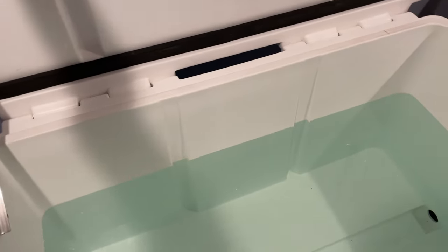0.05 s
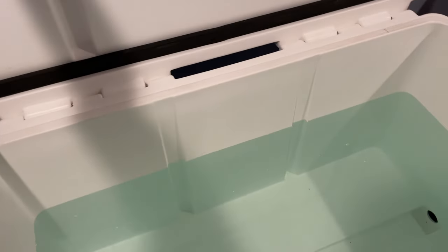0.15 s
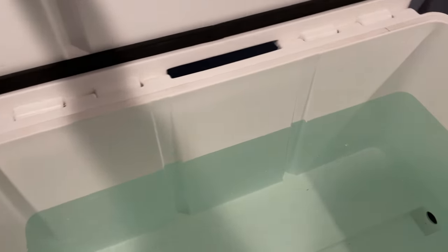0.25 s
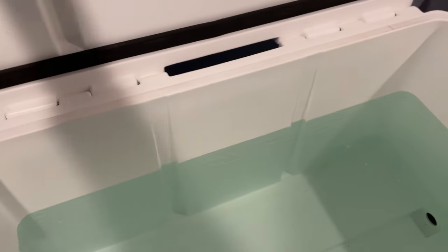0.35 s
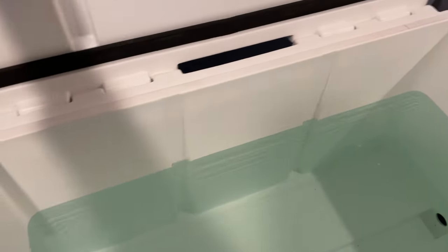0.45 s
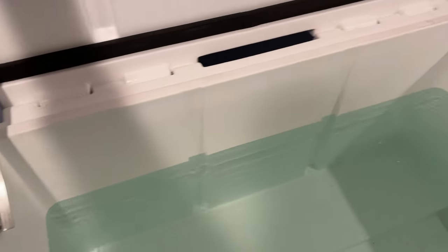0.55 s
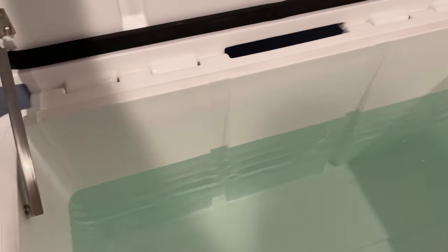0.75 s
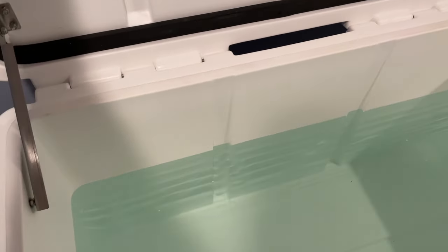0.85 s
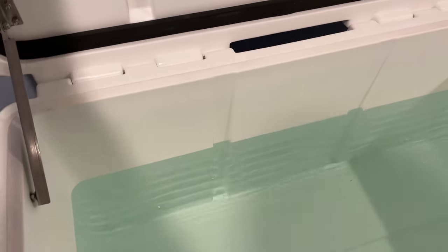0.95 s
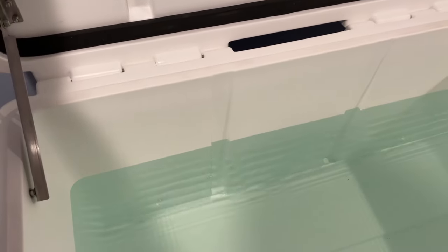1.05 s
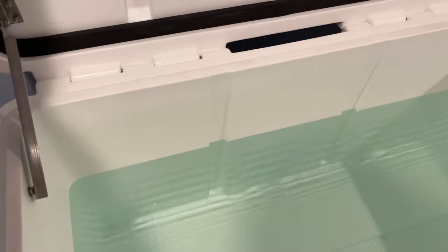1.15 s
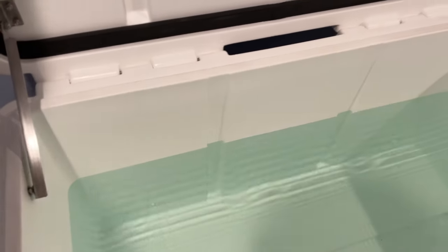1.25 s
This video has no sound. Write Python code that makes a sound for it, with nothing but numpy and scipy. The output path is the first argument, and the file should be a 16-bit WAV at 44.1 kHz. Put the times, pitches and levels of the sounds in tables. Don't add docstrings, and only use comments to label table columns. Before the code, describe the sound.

A heavy cooler lid scrapes softly on its hinge, slams back with a loud hollow plastic thump and low boom, bounces and rattles briefly, then gives faint clicks; close phone microphone, short reflections from nearby walls.

```python
import sys
import numpy as np
from scipy import signal
from scipy.fft import rfft, irfft
from scipy.io import wavfile
from scipy.ndimage import uniform_filter1d

SR = 44100
rng = np.random.default_rng(int(sys.argv[2]) if len(sys.argv) > 2 else 0)


def master_out(mix):
    frames = np.transpose(np.atleast_2d(mix))
    ceiling = np.clip(frames, -1, 1)
    pcm = np.round(ceiling * 32767).astype(np.int16)
    wavfile.write(sys.argv[1], SR, pcm)


def ratio_of_db(decibels):
    return 10 ** (np.asarray(decibels, float) / 20)


N = 57330

# frequency in Hz, density in dB per Hz.
AIR_COLOUR = [(18, -58.5), (30, 4.5), (150, 6.5), (189, -7), (226, -12.5), (452, -18), (716, -32),
              (1110, -24), (13600, -56)]
AIR_DB = -50.5

# frequency in Hz, t60 in seconds.
WALL_DECAY = [(100, 0.73), (500, 0.31), (2000, 0.34), (6000, 0.19), (13000, 0.21)]
WALLS_DB, WALLS_RISE_S, WALLS_FROM_HZ = -7, 0.0092, 285

# start in seconds, frequency in Hz, level in dB, t60 in seconds.
STAY_TICKS = [
    (.716, 1130, -44, .022),
    (.718, 2200, -43, .015),
    (.719, 620, -48, .015),
    (.722, 4300, -68, .015),
    (.800, 5150, -72, .2),
    (.850, 2900, -50, .012),
    (.852, 5150, -72, .25),
    (.870, 2200, -46, .014),
    (.935, 5170, -70, .5),
]

# start in seconds, frequency in Hz, level in dB, t60 in seconds.
PART_NOTES = [(.003, 468, -27, 0.24), (.082, 441, -25.5, 0.18), (.193, 207.3, -21, 0.13),
              (.197, 77, -17.5, 0.26), (.265, 3640, -22, 0.02), (.265, 6200, -34, 0.13),
              (.266, 496, -2.5, 0.044), (.266, 4150, -28, .04), (.267, 615, -6.5, 0.02),
              (.272, 334, -12.5, 0.16), (.286, 337, -15.5, 0.076), (.290, 677, -22.5, 0.13),
              (.297, 1178, -31.5, 0.29), (.298, 4000, -32.5, 0.1), (.305, 151.6, -11.5, .13),
              (.310, 431.2, -12, 0.12), (.325, 63.3, -10, 0.26), (.326, 1196, -26.5, 0.11),
              (.330, 660, -26, 0.13), (.345, 1455, -32.5, 0.067), (.391, 4100, -34.5, 0.084),
              (.391, 4180, -38, 0.042), (.410, 4800, -43, 0.0386), (.410, 6370, -36.5, 0.037),
              (.411, 7400, -49, .07), (.416, 5160, -38, 0.055), (.469, 142.4, -27, 0.93),
              (.478, 474.6, -34, 0.21), (.507, 243, -29.5, 0.71), (.53, 59, -35, 1.6),
              (.545, 433.6, -38.5, 0.18), (.752, 501, -41.5, 0.063), (.790, 138, -37, 0.13),
              (.838, 485, -35.5, 0.076), (.848, 319, -33, 0.068), (.851, 165.5, -28, 0.1),
              (.880, 319.1, -39.5, 0.23), (.919, 9814, -47.5, 0.2), (.920, 793, -44, .12),
              (.920, 5280, -52, 0.069), (.921, 540, -41, .15), (.921, 1150, -45, 0.15),
              (.921, 2210, -48, 0.063), (.921, 4100, -59, 0.12), (.921, 5500, -62, .07),
              (.921, 6140, -57, .08), (.953, 413.2, -37, 0.33), (.985, 250, -43, 0.52),
              (1.061, 489, -30.5, 0.064), (1.061, 960, -46.5, 0.045), (1.064, 121.7, -27.5, 0.095),
              (1.082, 396, -42, 0.1), (1.136, 54.4, -35.5, 0.78), (1.252, 329, -45.5, 0.3)]
WAVER_CYCLES, WAVER_DB = 14, 1.1
RISE_SHARE = 0.018

# time in seconds, level in dB.
RUB_EFFORT = [
    (0, -40.5),
    (.07, -40),
    (.18, -37.5),
    (.25, -37.5),
    (.34, -39.5),
    (.42, -46),
    (0.499, -56.5),
    (.56, -62.5),
    (.64, -78),
]
# frequency in Hz, density in dB per Hz.
RUB_COLOUR = [(60, -45), (150, -38.5), (430, -2.5), (700, -11), (2000, -21.5), (6200, -34.5), (9500, -39.5),
              (13600, -43.5)]
# mode in Hz, level in dB, t60 in seconds.
HELD_LID = [(441, -1.5, 0.11), (485, -8, 0.086), (576.4, -6, 0.053), (660, -18, .07), (786, -19.5, .06),
            (924, -21, .12), (1040.4, -14, 0.094), (1169, -22.5, .07)]
# mode in Hz, level in dB, t60 in seconds.
STAY = [(2090, 0, .025), (2960, -2, .025), (4110, -4, .025), (5150, -8, .025), (6200, -8, .025),
        (9850, -14, .02), (10800, -10, .015), (12400, -16, .02)]
RUB_HISS_DB, RUB_LID_DB, RUB_STAY_DB = 3, 2, -17
SLIPS_PER_S, SLIP_SCATTER_DB = 3500, 2

# start in seconds, tub level in dB, lid level in dB, contact time in ms.
HITS = [(.001, -70, -41, 22), (0.087, -72, -36, 3.9), (0.196, -30, -34, 6.1), (.265, -54, -14.5, 10.3),
        (0.297, -24, -21, 34.6), (.335, -30.5, -37, 2.1), (0.393, -24, -30.5, 19.7),
        (0.411, -30.5, -37.5, 18), (.455, -22.5, -32.5, 20.3), (0.504, -33.5, -43, 6.9),
        (.733, -55, -47, 36), (.785, -43.5, -49, 15), (.836, -62, -44.5, 12), (.850, -45, -46.5, 9.7),
        (.900, -43, -51.5, 6), (0.921, -46, -45, 20), (.945, -45.5, -50.5, 19), (0.991, -61, -51.5, 31),
        (1.062, -39, -42.5, 14.2), (1.13, -54, -53.5, 4.8), (1.251, -51.5, -55, 7.8),
        (1.283, -42, -48.5, 22)]
# mode in Hz, level in dB, t60 in seconds.
TUB = [(59, 7, .3), (72, -8, 0.087), (108.3, -1, 0.35), (156.6, 3, 0.18), (222, 2.5, 0.34), (243, -3, 1)]
# mode in Hz, level in dB, t60 in seconds.
LID = [(290, -15.5, 0.028), (334, -5.5, 0.11), (392.4, 1, 0.037), (436.7, -3, 0.17), (465.7, -6.5, 0.1),
       (513, -18.5, 0.069), (571, -11.5, 0.071), (654, -11.5, 0.095), (792, -12.5, 0.059),
       (855, -22.5, 0.088), (1022, -20, 0.11), (1132, -22, 0.067), (1260, -50, .06)]
MODE_SCATTER_DB = 3
# start in seconds, level in dB, length in ms, tilt in dB per octave.
CRACKS = [(.264, -18, 22, -2.03), (.297, -23, 12.8, -0.5), (.391, -40, 7.2, -1.5), (.410, -39, 8.9, 1.5),
          (.470, -48, 20, -0.4), (.708, -66, 6.2, -3), (.830, -50.5, 16, -6), (.847, -45.5, 18, -6),
          (.870, -50, 4.2, -7.5), (.918, -45.5, 11, 4), (.927, -42, 21, -6), (1.059, -53, 22, -12),
          (1.254, -61.5, 16, -3.5), (1.290, -69.5, 3, 0.5)]
# frequency in Hz, density in dB per Hz.
CRACK_COLOUR = [(200, -36), (500, -11.5), (1000, -15), (1850, -26), (4000, -22), (6400, -30), (9300, -31.5),
                (13600, -33.5)]
GENTLE_DB = -52

# frequency in Hz, side minus mid in dB.
SIDE_DB = [(60, -22), (250, -10.5), (500, -6), (1400, 2), (3000, -1), (6000, -3.5), (10000, 1.5),
           (15000, -4.5)]
LEFT_SHARE = .11
MID_NULL_HZ, MID_TOP_NULL_HZ, SIDE_NULL_HZ = (7580, 9000), (13750, 23000), (10900, 12400)
NULL_DB = -40
LOW_CUT_HZ, TOP_HZ, CEILING = 71, 16000, 1.1


def read(table, hz):
    table = np.array(table, float)
    return np.interp(np.log(hz + 1), np.log(table[:, 0]), table[:, 1])


def unit(x):
    return x / np.sqrt(np.mean(x ** 2))


def add(out, at, x):
    start = int(max(at, 0) * SR)
    part = out[start:start + len(x)]
    part += x[:len(part)]


def colour(x, table, tilt_db=0.):
    hz = np.fft.rfftfreq(4096, 1 / SR)
    gain = unit(ratio_of_db(read(table, hz) + tilt_db * np.log2(hz / 3000 + 0.071)))
    cepstrum = irfft(np.log(gain))
    cepstrum[1:2048] *= 2
    cepstrum[2049:] = 0
    reply = irfft(np.exp(rfft(cepstrum)))
    reply = reply.reshape((1,) * (x.ndim - 1) + (-1,))
    return signal.fftconvolve(x, reply, axes=-1)[..., :x.shape[-1]]


def fade(t, t60):
    return 1000. ** (-t / max(t60, .005))


def ring(x, modes, scatter_db=0.):
    longest = max(t60 for _, _, t60 in modes)
    t = np.arange(int(np.clip(longest * SR, 500, len(x)))) / SR
    luck = scatter_db * rng.standard_normal(len(modes))
    reply = np.zeros(len(t))
    for (hz, db, t60), extra_db in zip(modes, luck):
        reply += ratio_of_db(db + extra_db) * np.sin(2 * np.pi * hz * t) * fade(t, t60)
    return signal.fftconvolve(x, reply)[:len(x)]


def shove(db, ms):
    push = np.sin(np.pi * np.clip(np.arange(N // 2) / SR * 1000 / max(ms, .3), 0, 1))
    return ratio_of_db(db) * push / push.sum()


def jolt(db, ms, rise=.08):
    t = np.arange(N // 2) / SR * 1000 / max(ms, .3)
    swell = 1 - np.exp(-t / max(rise, .01))
    shape = swell * np.exp(-t) * rng.standard_normal(len(t))
    return ratio_of_db(db) * shape / np.sqrt(np.sum(shape ** 2))


def air():
    return ratio_of_db(AIR_DB) * colour(rng.standard_normal((2, N)), AIR_COLOUR)


def walls(x):
    t, hz = np.arange(N) / SR, np.fft.rfftfreq(N, 1 / SR) + 1
    noise = rfft(rng.standard_normal((2, N)))
    reply = 0
    for centre in 60 * 2. ** np.arange(9):
        share = np.cos(np.pi / 2 * np.clip(np.log2(hz / centre), -1, 1)) ** 2
        reply = reply + irfft(noise * share, N) * 1000. ** (-t / max(read(WALL_DECAY, centre), .05))
    reply = reply * np.clip(t / WALLS_RISE_S, 0, 1) ** 2
    reply = reply / np.sqrt(np.sum(reply ** 2) / 2)
    return signal.fftconvolve(x[None], reply, axes=1)[:, :N]


def notes(table):
    out = np.zeros(N)
    for at, hz, db, t60 in table:
        span = int(np.clip(WAVER_CYCLES * SR / hz, 40, 4000))
        drift = uniform_filter1d(rng.standard_normal((2, N // 2)), span)
        waver = unit(uniform_filter1d(drift, span))
        t = np.arange(int(np.clip(t60 * SR, 500, N // 2))) / SR
        level_waver, phase_waver = waver[:, :len(t)]
        rise = 1 - np.exp(-t / max(1.2 / hz, RISE_SHARE * t60))
        tone = np.sin(2 * np.pi * hz * t + 0.53 * phase_waver)
        add(out, at, ratio_of_db(db + WAVER_DB * level_waver) * rise * tone * fade(t, t60))
    return out


def rub():
    size = ratio_of_db(SLIP_SCATTER_DB * rng.exponential(size=N)) * rng.standard_normal(N)
    grains = unit(size * (rng.random(N) < SLIPS_PER_S / SR))
    slips = unit(grains + 1.12 * rng.standard_normal(N))
    t, db = np.array(RUB_EFFORT).T
    effort = ratio_of_db(np.interp(np.arange(N) / SR, t, db, right=-120))
    hiss = ratio_of_db(RUB_HISS_DB) * colour(slips, RUB_COLOUR)
    lid = ratio_of_db(RUB_LID_DB) * unit(ring(slips, HELD_LID))
    stay = ratio_of_db(RUB_STAY_DB) * unit(ring(slips, STAY))
    return effort * (hiss + lid + stay)


def knocks():
    out = np.zeros(N)
    for at, tub_db, lid_db, ms in HITS:
        boom = ring(shove(tub_db - 6, 0.29 * ms), TUB, MODE_SCATTER_DB)
        soft_jolt = uniform_filter1d(jolt(lid_db + 4.0, ms, 0.22), size=14, origin=-7)
        add(out, at, boom + ring(soft_jolt, LID, MODE_SCATTER_DB))
    return out


def cracks():
    out = np.zeros(N)
    for at, db, ms, tilt_db in CRACKS:
        rise = .06 if db > GENTLE_DB else .6
        add(out, at, colour(jolt(db + 26, ms, rise), CRACK_COLOUR, tilt_db))
    return out


def null(hz, band):
    inside = np.minimum(hz - band[0], band[1] - hz)
    return ratio_of_db(NULL_DB * np.clip(inside / 150, 0, 1))


def ports(dry, wet, noise):
    smear = rng.standard_normal(1024) * np.exp(-np.arange(1024) / SR / 0.0058)
    smear = smear / np.sqrt(np.sum(smear ** 2))
    mid = rfft(dry + wet[0] + noise[0])
    apart = rfft(signal.fftconvolve(dry, smear)[:N] + ratio_of_db(-2.0) * wet[1] + noise[1])
    hz = np.fft.rfftfreq(N, 1 / SR)
    side = apart * ratio_of_db(read(SIDE_DB, hz)) + LEFT_SHARE * mid
    side = irfft(side * null(hz, SIDE_NULL_HZ), N)
    mid = irfft(mid * null(hz, MID_NULL_HZ) * null(hz, MID_TOP_NULL_HZ), N)
    return np.array([mid + side, mid - side])


def scene():
    dry = knocks() + cracks() + notes(PART_NOTES) + rub()
    no_bass = signal.butter(2, WALLS_FROM_HZ, "high", fs=SR, output="sos")
    wet = ratio_of_db(WALLS_DB) * walls(signal.sosfilt(no_bass, dry))
    return ports(dry + notes(STAY_TICKS), wet, air())


def band_limit(x):
    return signal.sosfilt(signal.butter(12, 16500, fs=SR, output="sos"), x)


def record(dry):
    low_cut = signal.butter(2, LOW_CUT_HZ, "high", fs=SR, output="sos")
    top_cut = signal.ellip(8, .2, 45, TOP_HZ, fs=SR, output="sos")
    x = signal.sosfilt(low_cut, dry)
    x = CEILING * np.tanh(x / CEILING)
    return band_limit(signal.sosfilt(top_cut, x))


dry = scene()
out = record(dry)
master_out(out)
```